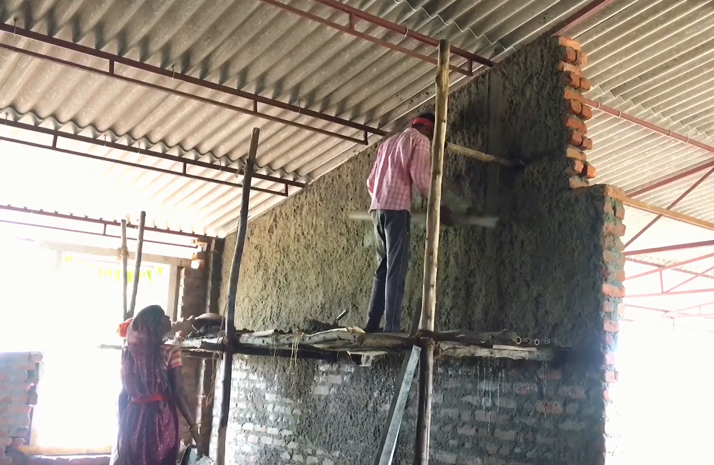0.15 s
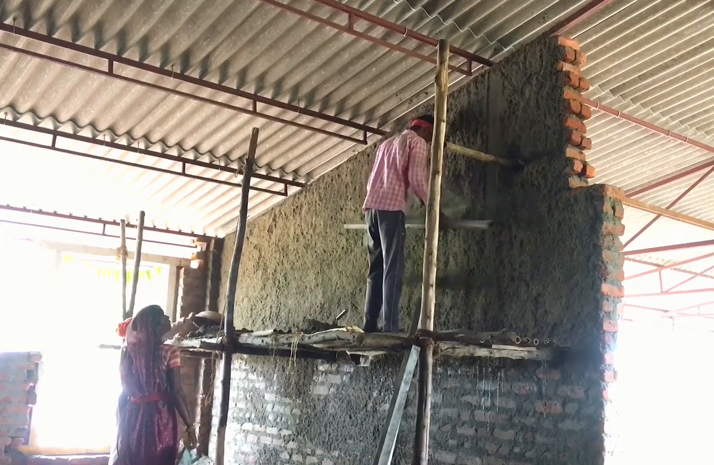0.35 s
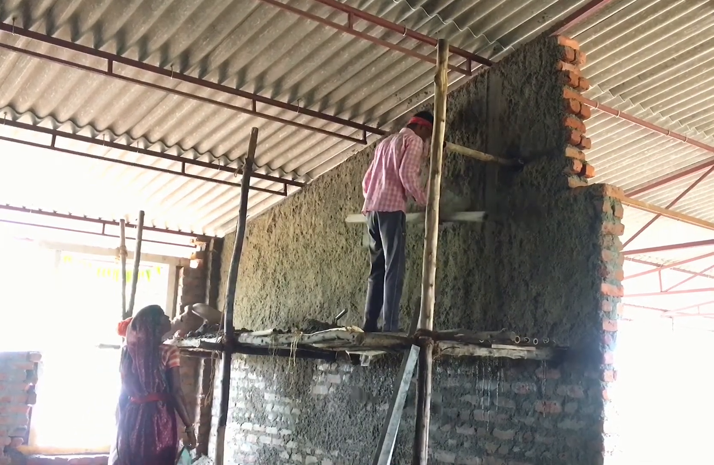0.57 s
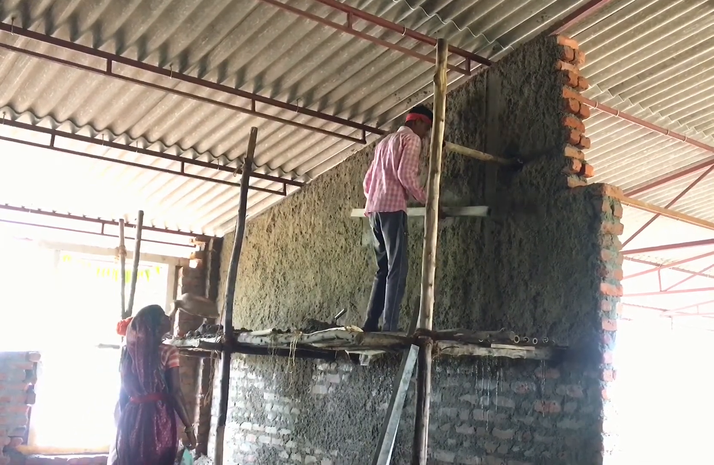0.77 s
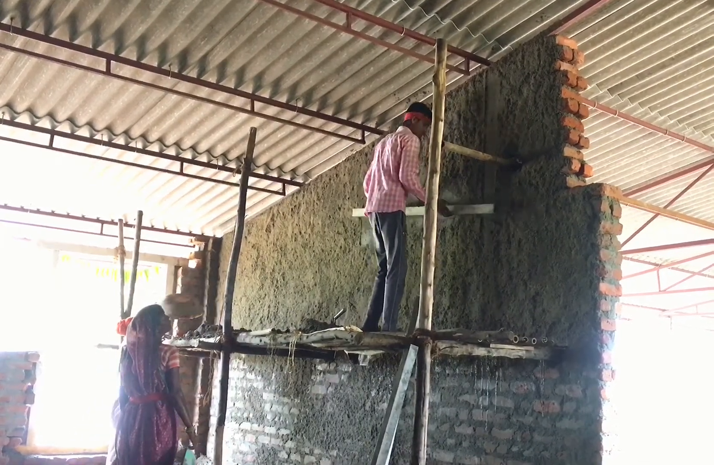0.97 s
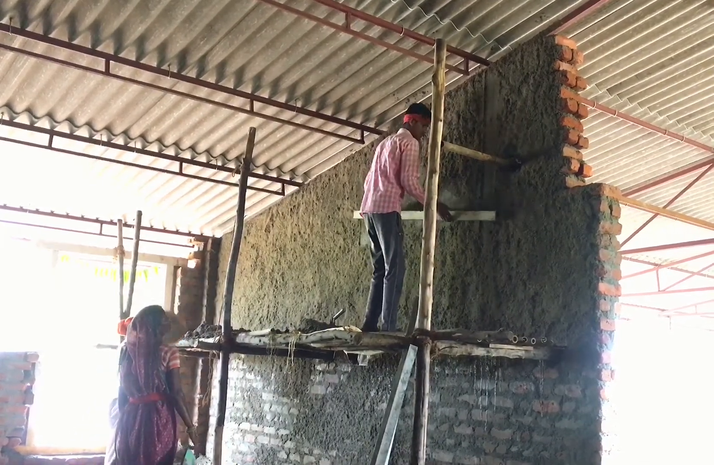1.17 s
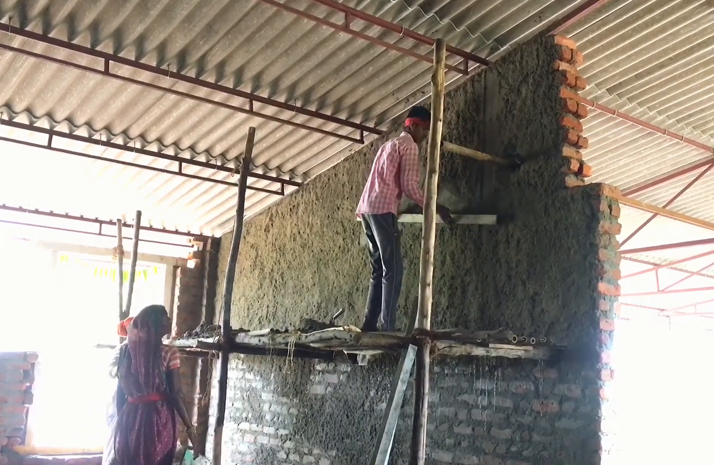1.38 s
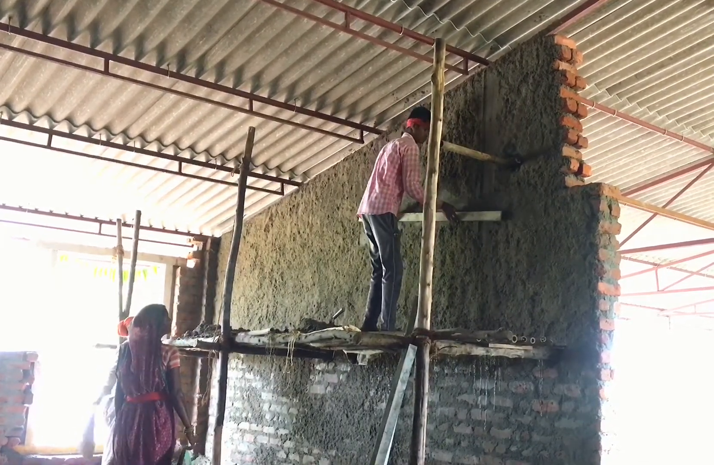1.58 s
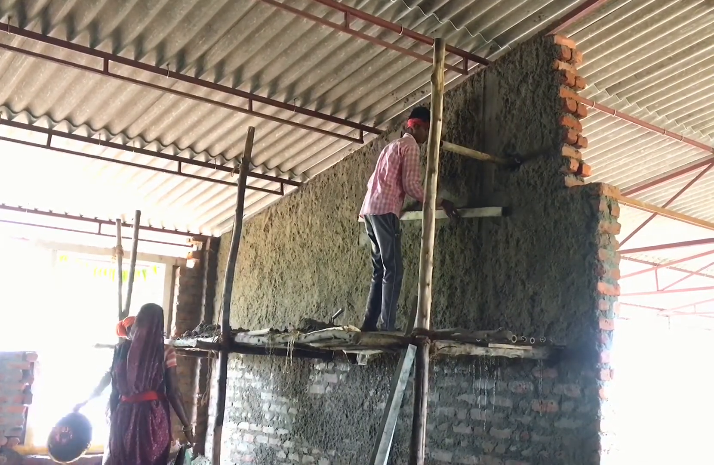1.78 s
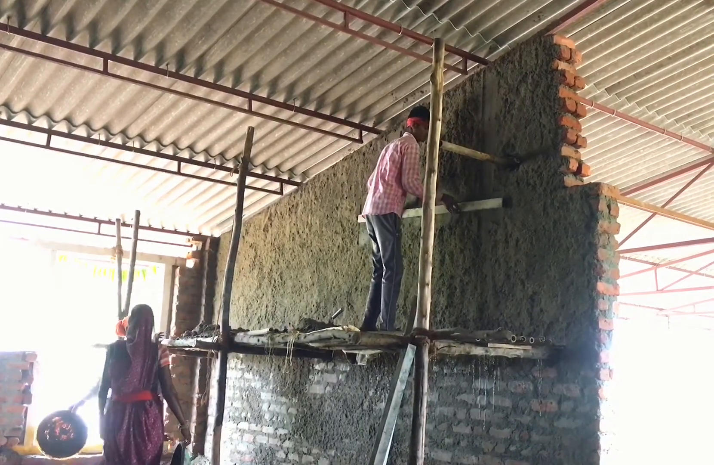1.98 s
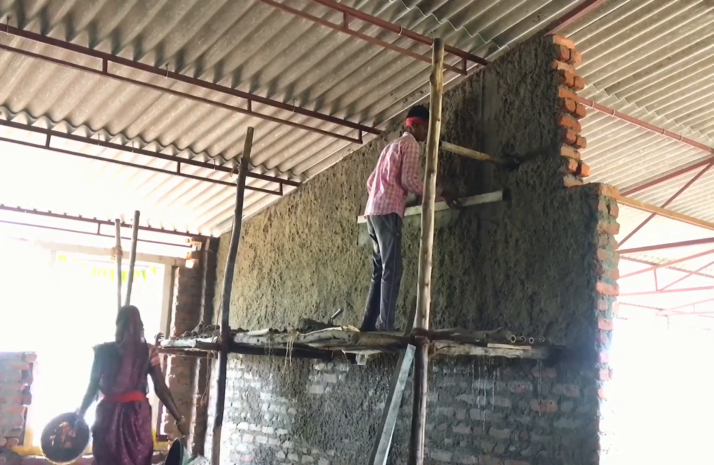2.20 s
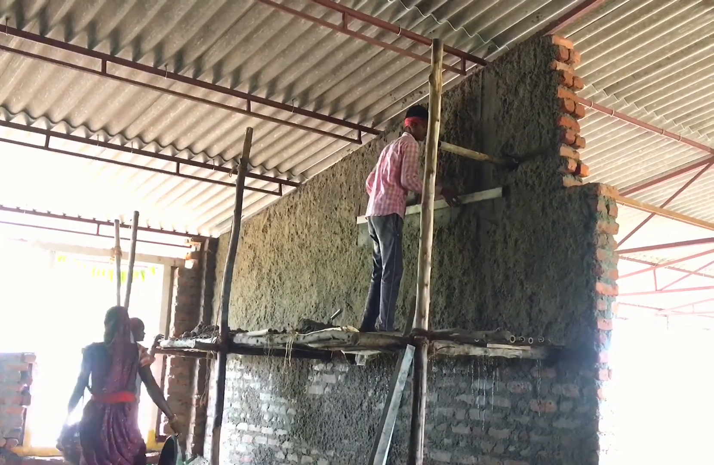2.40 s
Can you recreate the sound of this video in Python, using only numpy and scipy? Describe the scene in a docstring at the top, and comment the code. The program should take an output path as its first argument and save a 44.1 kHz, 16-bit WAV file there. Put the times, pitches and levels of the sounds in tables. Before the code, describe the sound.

Gritty plaster scraping in a large roofed hall, heard from a few metres. First a load thumps onto scaffold boards, then a mortar pan slides and knocks, and a long bar rasps across the damp wall with a light echo.

```python
"""A long straightedge is drawn over damp plaster on a brick wall, a few metres away under a high roof.
Sand catches under the bar, so it rasps, hisses and rings faintly. Before the stroke, a load thumps
down on the scaffold boards and a mortar pan slides and knocks: each blow is ringing modes, a thud,
a clack and a spray of grit. Sand scuffs in between and the scaffold bumps softly as weight shifts.
Knocks and scrapes echo off the walls and the sheet roof, over open air and a low distant drone."""
import sys
import numpy as np
from scipy import signal
from scipy.fft import rfft, irfft
from scipy.io import wavfile

SR = 44100
rng = np.random.default_rng(int(sys.argv[2]) if len(sys.argv) > 2 else 0)


def unload_wav(signal):
    """Save mono or channel-first audio to the path in sys.argv[1] as 16-bit WAV at rate SR, clipped to [-1, 1]."""
    wavfile.write(
        sys.argv[1],
        SR,
        np.round(np.clip(np.atleast_2d(signal).T, -1, 1) * 32767).astype(np.int16),
    )


N = 108045
T = np.arange(N) / SR

# tone of loose grit, in scuffs and blows (frequency [Hz], relative level [dB])
GRIT_SPECTRUM = [(150, -42), (500, 7.5), (1000, 7), (2000, 6.5), (3200, -0.5), (4800, -4), (6500, -2.5),
                 (9500, -6.5), (10300, -8), (11500, -9), (15500, -18.5)]


def amp(db):
    """Decibels to gain."""
    return 10 ** (np.asarray(db) / 20)


def unit(x):
    """Scales to rms 1."""
    return x / np.sqrt(np.mean(x ** 2) + 1e-20)


def curve_at(points, hz):
    """Reads a curve on a log-frequency axis."""
    freqs, values = np.transpose(points)
    return np.interp(np.log(hz + 1), np.log(freqs + 1), values)


def colour(x, spectrum):
    """Shapes x with an EQ curve, at rms 1."""
    gain = amp(curve_at(spectrum, np.fft.rfftfreq(N, 1 / SR)))
    return unit(irfft(rfft(x) * gain, N))


def resonate(x, hz, width_hz):
    """Rings one resonance with x, at rms 1."""
    pole = np.exp((2j * np.pi * hz - np.pi * width_hz) / SR)
    return unit(signal.lfilter([1], [1, -pole], x).real)


def grains(per_s, spread_db):
    """Clicks of crushed sand, of random size, at rms 1."""
    size = amp(spread_db * np.minimum(rng.exponential(1, N), 5))
    return unit(size * rng.standard_normal(N) * (rng.random(N) < per_s / SR))


def flicker(rate_hz, depth_db):
    """A gain that wanders at random, by depth_db rms."""
    rolloff = 1 + (np.fft.rfftfreq(N, 1 / SR) / rate_hz) ** 4
    wander = unit(irfft(rfft(rng.standard_normal(N)) / rolloff, N))
    return amp(depth_db * wander)


def struck(start, rise_s, t60):
    """Envelope of a hit: rounded attack, exponential decay."""
    age = np.maximum(T - start, 0)
    return np.sin(np.pi / 2 * np.minimum(age / rise_s, 1)) ** 2 * amp(-60 * age / t60)


def background():
    """A bed of open air and a far drone, whose narrow noise bands waver."""
    # hum bands (frequency [Hz], width [Hz], level [dB])
    drone_bands = [(62.57, 13.56, -62), (170.85, 16.7, -67)]
    # tone of the air (frequency [Hz], relative level [dB])
    air_spectrum = [(20, -3), (45, 4), (90, 8.5), (170, -10), (300, -5.5), (500, -11.5), (1200, -10),
                    (3000, -17.5), (8000, -24), (11000, -26.5), (15500, -32.5)]
    drone = np.zeros(N)
    for hz, width, db in drone_bands:
        broad_band = resonate(rng.standard_normal(N), hz, 2 * width)
        drone += amp(db) * resonate(broad_band, hz, 2 * width)  # the second pass narrows it
    air = amp(-57.5) * colour(rng.standard_normal(N), air_spectrum)
    return drone + air * flicker(rate_hz=3.1, depth_db=0.456)


def sand_scuffs():
    """Short slides crush loose sand: a coarse scratch and a fine hiss swell and fade together."""
    # scuffs and shuffles (peak time [s], scratch level [dB], rise [s], fall [s], hiss level [dB])
    slides = [(.0, -55.5, 0.038, 0.0335, -56), (0.053, -57, 0.019, 0.13, -60.5),
              (0.137, -47, 0.0044, 0.0103, -37), (.215, -47, 0.0596, 0.0448, -60.5),
              (.415, -52.5, 0.0416, 0.0406, -52.5), (.486, -61, 0.02, 0.0535, -59.5),
              (.61, -68, 0.034, 0.032, -58), (0.658, -54, 0.05, 0.0344, -49.5),
              (0.711, -41, 0.0245, 0.0454, -37), (.80, -55, 0.024, 0.12, -58),
              (.97, -58.5, 0.06, 0.059, -74.5), (1.046, -55.5, 0.12, 0.0382, -60),
              (1.16, -72.5, 0.033, 0.056, -65.5), (1.227, -74.5, 0.0093, 0.024, -66.5),
              (1.292, -93, 0.0105, 0.0356, -61.5), (1.426, -57.5, 0.0033, 0.0164, -71.5),
              (1.461, -55.5, 0.0034, 0.0535, -61.5), (1.616, -66.5, 0.0054, 0.013, -63.5)]
    # tone of the fine hiss (frequency [Hz], relative level [dB])
    hiss_spectrum = [(1000, -48.5), (3400, -2), (4900, -3.5), (6300, 0.5), (7600, -4), (9500, 0.5),
                     (10300, -9), (11500, -4), (15500, -12)]
    scratch_power, hiss_power = np.zeros(N), np.zeros(N)
    for peak, scratch_db, rise, fall, hiss_db in slides:
        swell = np.exp(-2 * np.maximum((peak - T) / rise, (T - peak) / fall))
        scratch_power += amp(scratch_db) ** 2 * swell
        hiss_power += amp(hiss_db) ** 2 * swell
    scratch = np.sqrt(scratch_power) * colour(grains(per_s=12000, spread_db=2.06), GRIT_SPECTRUM)
    hiss = np.sqrt(hiss_power) * colour(grains(per_s=14000, spread_db=1.18), hiss_spectrum)
    return (scratch + hiss) * flicker(rate_hz=48, depth_db=0.87)


def scaffold_bumps():
    """Muffled low swells as weight shifts on the scaffold."""
    # soft bumps (peak time [s], frequency [Hz], level [dB], half length [s])
    bumps = [(.017, 172.2, -38, 0.0131), (0.026, 271.7, -50.5, 0.0265), (0.045, 81, -52.5, 0.028),
             (.07, 173, -46.5, 0.025), (0.621, 73.4, -46.5, 0.0344), (0.966, 67.9, -46.5, 0.043),
             (1.424, 64.1, -51.5, .06), (1.979, 122.6, -56, 0.0606), (2.4, 168.6, -53, 0.043)]
    return sum(amp(db) * np.exp(-((T - peak) / half) ** 2) * np.sin(2 * np.pi * hz * (T - peak))
               for peak, hz, db, half in bumps)


def impacts(blows, modes, thud_spectrum, clack_spectrum, grit_t60, low_rise_s):
    """Each blow rings the modes of a body, with a dull thud, a clack and a spray of grit."""
    hard_hz = 400  # modes above this follow the clack, those below the weight of the blow
    out = np.zeros(N)
    for at, ring_db, thud_db, clack_db, grit_db, contact_s in blows:
        for hz, db, t60 in modes:
            drive_db, rise = (clack_db, contact_s) if hz > hard_hz else (ring_db, low_rise_s)
            out += amp(drive_db + db) * struck(at, rise, t60) * np.sin(2 * np.pi * hz * (T - at))
        thud = colour(rng.standard_normal(N), thud_spectrum)
        clack = colour(grains(per_s=8000, spread_db=1.26), clack_spectrum)  # a crowd of weak modes
        grit = colour(grains(per_s=14000, spread_db=2.35), GRIT_SPECTRUM)
        out += amp(thud_db) * struck(at, rise_s=0.00426, t60=0.297) * thud
        out += amp(clack_db - 4) * struck(at, contact_s, t60=0.2997) * clack
        out += amp(grit_db) * struck(at, contact_s + 0.00122, grit_t60) * grit
    return out


def board_thumps():
    """A load lands on the scaffold boards in three quick, boomy blows."""
    # hits (time [s], ring drive [dB], thud [dB], clack drive [dB], grit [dB], contact time [s])
    blows = [(.129, -31, -39.5, -25.5, -43.5, 0.0086), (.144, -22, -26.5, -37.5, -39.5, 0.0053),
             (.225, -26, -31.5, -54.5, -58.5, 0.0046)]
    # ring of the boards (frequency [Hz], gain [dB], t60 [s])
    modes = [(65.9, -12.5, 0.71), (92.2, 0.5, 0.279), (115, -1, 0.167), (181.03, -4.5, 0.394),
             (244.16, -1, 0.393), (255.53, -1, 0.342), (298.54, -12, 0.443), (325.44, -2.5, 0.2414),
             (365, -14, 0.404), (425, -32, 0.184), (492, -12.5, 0.135), (605.2, -1.5, 0.1428),
             (716.8, -17.5, 0.26), (1009, -6.5, 0.086), (1276, -22.5, 0.35), (1489, -9, 0.0946)]
    # tone of the thud and of the clack (frequency [Hz], relative level [dB])
    thud_spectrum = [(22, -54.5), (41, -28), (58, 30), (100, 16.5), (150, -19), (250, -7), (350, -8.5),
                     (450, -27), (900, -46.5)]
    clack_spectrum = [(100, -24), (300, 9.5), (620, -3.5), (820, 1), (1080, 0.5), (1500, -7), (1900, -12),
                      (3500, -12.5), (9000, -30)]
    return impacts(blows, modes, thud_spectrum, clack_spectrum, grit_t60=0.119, low_rise_s=0.00654)


def pan_knocks():
    """The mortar pan knocks three times, with a sharper attack and a longer tail of grit."""
    # hits (time [s], ring drive [dB], thud [dB], clack drive [dB], grit [dB], contact time [s])
    blows = [(.686, -53, -56.5, -42.5, -39, 0.0088), (.7055, -39.5, -29, -24, -36, 0.00206),
             (.733, -27.5, -32.5, -33.5, -39.5, 0.00255)]
    # ring of the pan (frequency [Hz], gain [dB], t60 [s])
    modes = [(114.6, -6, 0.267), (140.6, -13.5, 0.932), (171.77, -1, 0.506), (219.1, -10, 0.64),
             (294.3, -15, 0.618), (355.3, -7.5, 0.376), (545.8, -13.5, 0.126), (1037, -8, 0.169),
             (1179.4, -10, 0.122), (1899, -14, 0.164)]
    # tone of the thud and of the clack (frequency [Hz], relative level [dB])
    thud_spectrum = [(22, -45), (60, -15), (95, 1), (170, 7), (260, -8.5), (370, -7), (480, -16),
                     (900, -37.5)]
    clack_spectrum = [(100, -27.5), (350, 7.5), (700, -7.5), (860, -6), (1080, -6.5), (1450, -7),
                      (1900, -13), (3200, -25), (9000, -57.5)]
    return impacts(blows, modes, thud_spectrum, clack_spectrum, grit_t60=0.274, low_rise_s=0.00274)


def straightedge():
    """Sand drags under the bar: a rasp and a ring that grow with pressure, a hiss, a few catches."""
    # the stroke along the wall (time [s], pressure [dB], hiss level [dB])
    stroke = [(1.44, -96, -79), (1.462, -58, -59.5), (1.52, -54.5, -60), (1.572, -47.5, -62),
              (1.605, -56.5, -72.5), (1.655, -58, -68.5), (1.704, -46.5, -60), (1.81, -44.5, -55),
              (1.92, -43, -50), (2.04, -46, -54.5), (2.15, -44.5, -52.5), (2.32, -50.5, -56.5),
              (2.45, -52, -60.5)]
    # ring of the bar (frequency [Hz], width [Hz], gain at full pressure [dB], growth [dB per dB])
    bar_modes = [(272, 43, -20.5, 1), (373.65, 12, -12, 1.32), (463, 104, -19, 0.76),
                 (617.1, 32.2, -8.5, 0.94), (682, 53, -15.5, 0.62), (1017.5, 24, -20, 0.27),
                 (1125.4, 15.7, -13, 1.13), (1722, 212, -14.5, 0.66), (1910, 200, -20, 3.44),
                 (2550, 260, -18.5, 0.45)]
    # larger grains caught under the bar (time [s], level [dB])
    caught_grains = [(1.555, -50.5), (1.815, -52), (1.935, -46), (2.14, -49)]
    # tone of the rasp and of the sandy hiss (frequency [Hz], relative level [dB])
    rasp_spectrum = [(100, -29.5), (250, -17), (400, -8.5), (540, -0.5), (700, -4), (940, 1.5), (1050, -6),
                     (1180, -2), (1800, 1.5), (2600, -1), (3000, -6.5), (5000, -15), (9000, -14.5),
                     (15500, -30.5)]
    hiss_spectrum = [(1000, -12), (3400, 6), (4800, 1.5), (6500, 1.5), (9500, -4.5), (10300, -8.5),
                     (11500, -4.5), (15500, -18)]
    times, stroke_db, hiss_db = np.transpose(stroke)
    full_db = stroke_db.max()
    pressure_db = np.interp(T, times, stroke_db, left=-120) - full_db  # 0 at full pressure
    friction = grains(per_s=9000, spread_db=1.02) * flicker(rate_hz=72, depth_db=0.67)
    rasp = amp(pressure_db - 4.5) * colour(friction, rasp_spectrum)
    ring = sum(amp(db + growth * pressure_db) * resonate(grains(per_s=4000, spread_db=3.23), hz, width)
               for hz, width, db, growth in bar_modes)
    hiss_envelope = amp(np.interp(T, times, hiss_db, left=-120))
    hiss = hiss_envelope * colour(grains(per_s=12000, spread_db=1.04), hiss_spectrum)
    catch_envelope = sum(amp(db) * struck(at, rise_s=0.003, t60=0.159) for at, db in caught_grains)
    catches = catch_envelope * colour(grains(per_s=5000, spread_db=0.93), rasp_spectrum)
    return amp(full_db) * (rasp + ring) + hiss + catches


def add_reflections(x):
    """Nearby hard surfaces comb the treble."""
    # first bounces off the wall and the boards (delay [s], gain [dB])
    bounces = [(.0009, -27.5), (.0023, -22), (.0041, -19), (.0067, -22), (0.0113, -24)]
    treble = signal.sosfilt(signal.butter(2, 1500, "high", fs=SR, output="sos"), x)
    return x + sum(amp(db) * np.interp(T - delay, T, treble, left=0) for delay, db in bounces)


def hall_reverb(x):
    """Diffuse echoes from the walls and the roof: a noise tail, each band dying at its own rate."""
    # reverb decay (frequency [Hz], t60 [s])
    decay_times = [(60, 1), (250, 0.704), (1000, 0.73), (4000, 0.956), (15000, 0.392)]
    fade_in = np.clip((T[:SR] - 0.008) / 0.00836, 0, 1)  # after 8 ms of pre-delay
    hz, age, bands = signal.stft(rng.standard_normal(SR) * fade_in, SR, nperseg=256)
    decay = amp(-60 * age / curve_at(decay_times, hz)[:, None])
    tail = signal.istft(bands * decay, SR, nperseg=256)[1]
    return signal.fftconvolve(x, tail / np.linalg.norm(tail))[:N]


def scene():
    """Mono mix: knocks and rubbing feed the reverb; bumps and background stay dry."""
    knocks = board_thumps() + pan_knocks()
    rubbing = add_reflections(sand_scuffs() + straightedge())
    echoes = hall_reverb(amp(-11.5) * knocks + amp(-11) * rubbing)
    return (knocks + rubbing + echoes + scaffold_bumps() + background())[None]


def record(dry):
    """A steep low-pass trims the very top of the treble."""
    lowpass = signal.firwin(511, cutoff=15750, window=("kaiser", 9), fs=SR)
    return signal.oaconvolve(dry, lowpass[None], "same")


dry = scene()
out = record(dry)
unload_wav(out)
```